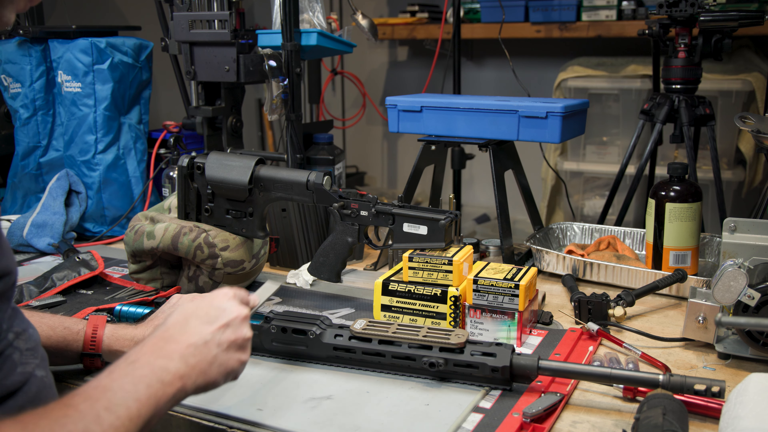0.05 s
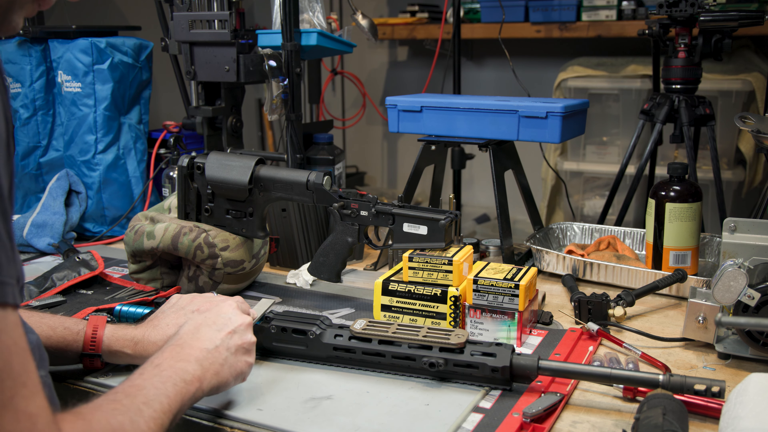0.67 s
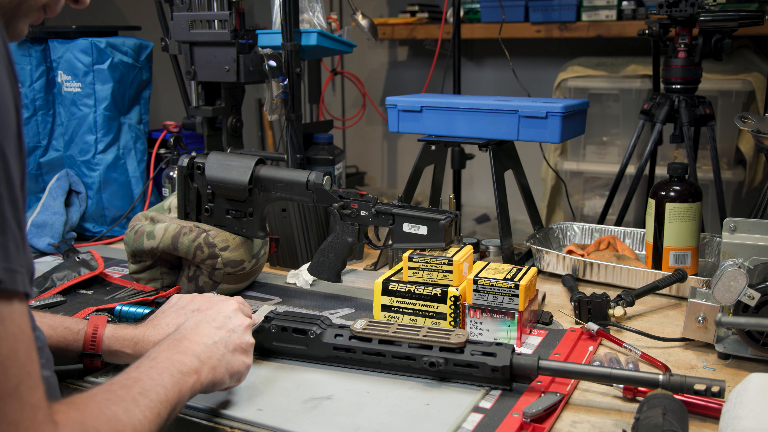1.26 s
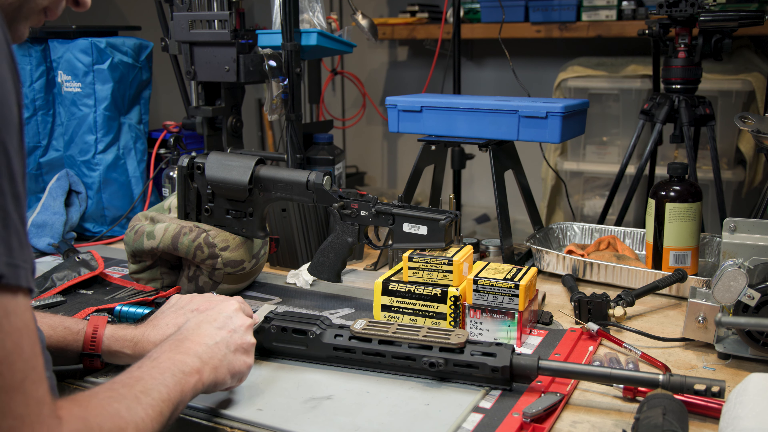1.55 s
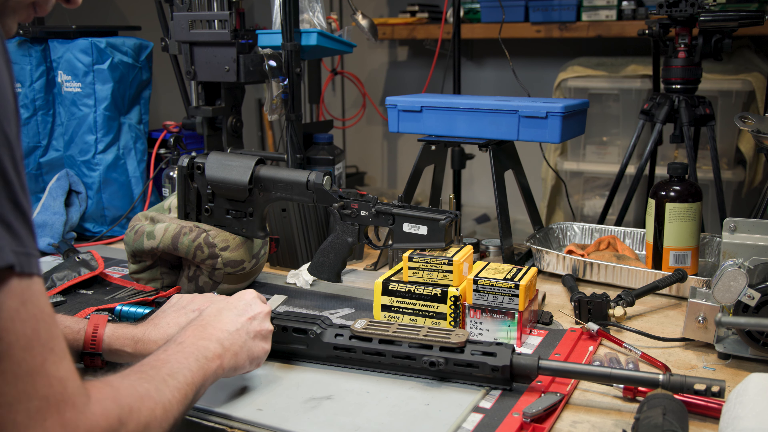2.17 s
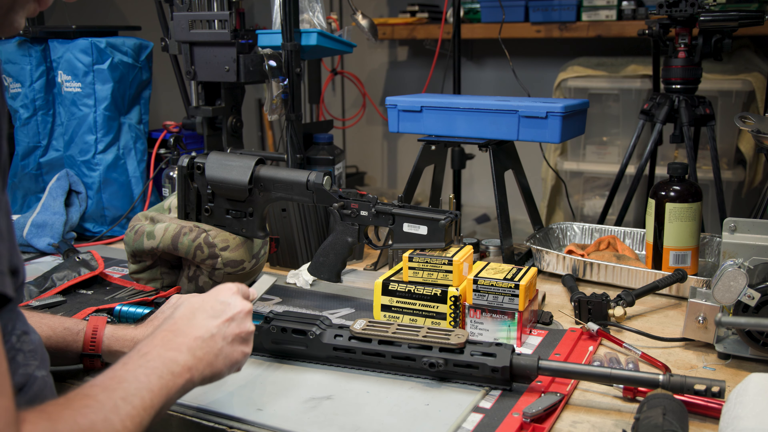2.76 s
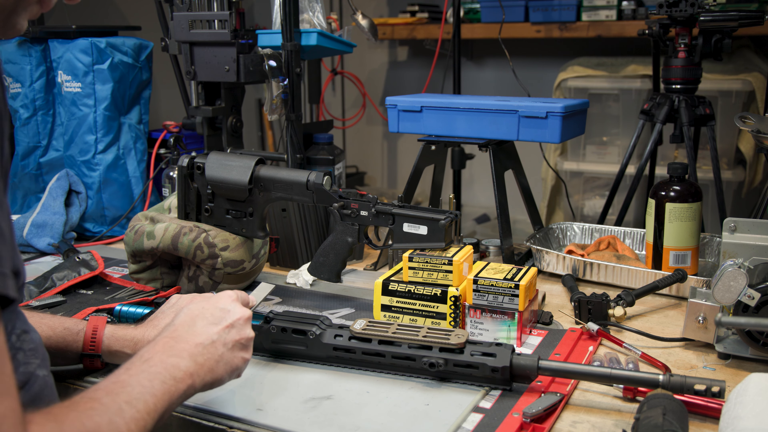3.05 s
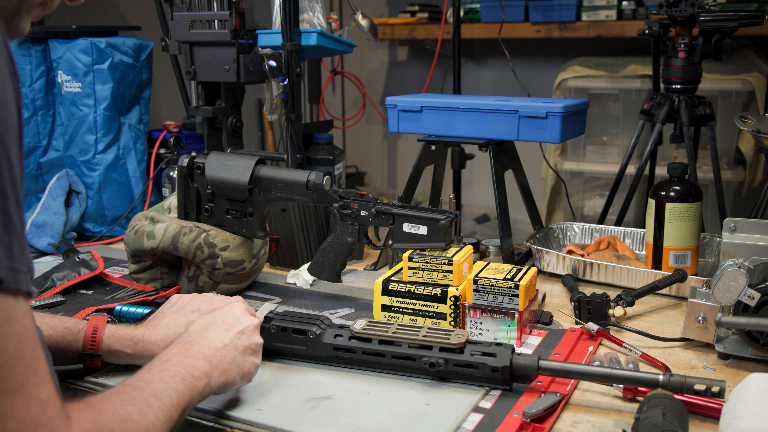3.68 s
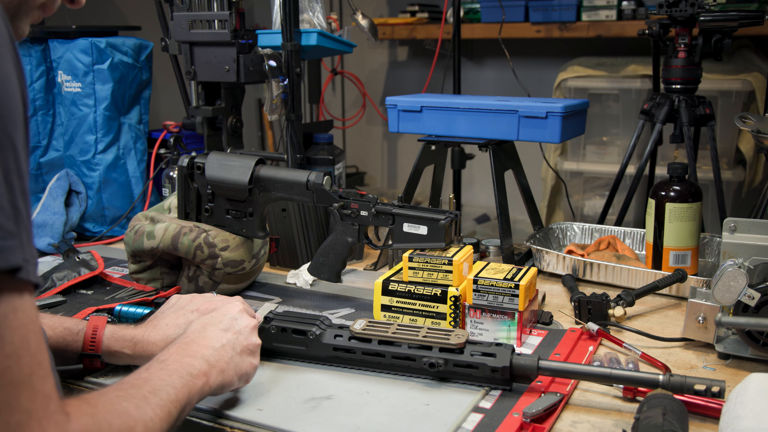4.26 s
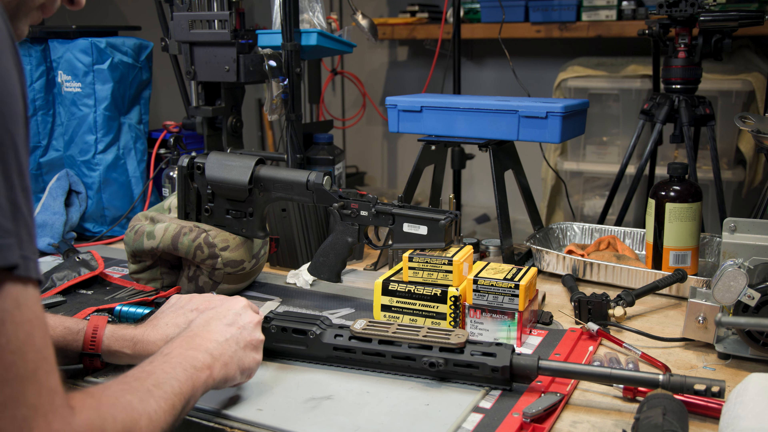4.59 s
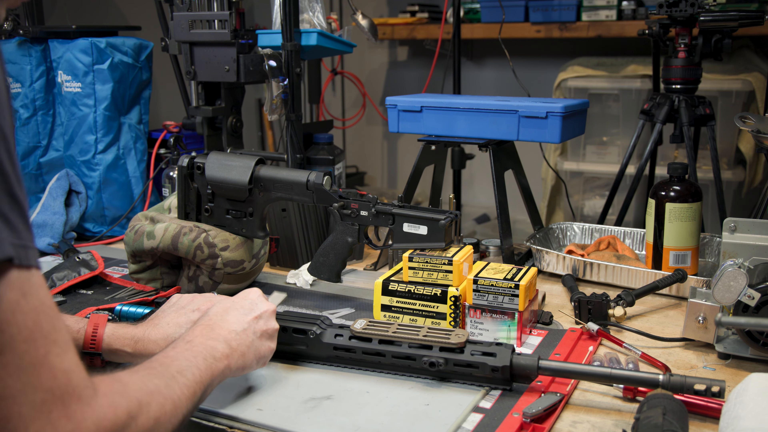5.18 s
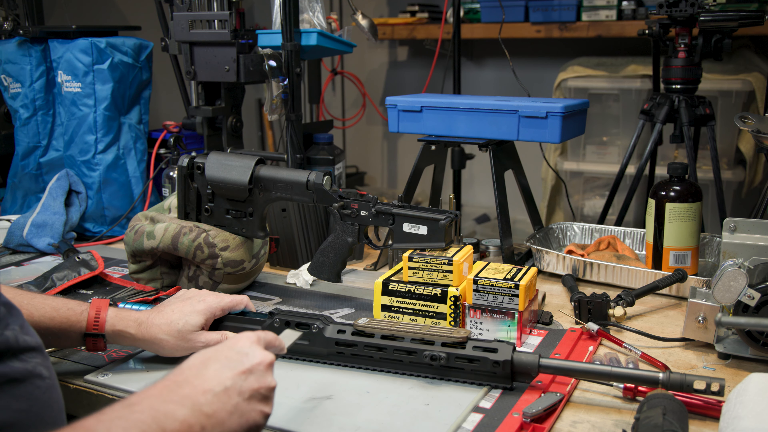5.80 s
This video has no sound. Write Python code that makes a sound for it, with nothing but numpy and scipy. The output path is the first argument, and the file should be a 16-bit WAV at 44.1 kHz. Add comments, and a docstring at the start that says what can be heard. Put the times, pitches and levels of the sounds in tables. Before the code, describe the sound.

A loose metal fitting clicks a few times. A metal file lands on a metal part with a sharp knock, then is drawn across it in one bright, rasping stroke followed by a short scrape. The knock, stroke and scrape happen a second time. At the end, hands shift with a dry tick and the part slides softly on its mat. A fan hums faintly throughout in the small workshop.

```python
"""A small workshop, at the bench, with a fan humming behind. A metal file lands on a metal part with a
knock, then is drawn across it in a rasping stroke and a short after-scrape; this happens twice.
The teeth catch at random and ring the steel and the bench top. A loose fitting clicks at the start;
at the end the hands shift and the part slides a little on its mat."""
import sys
import numpy as np
from scipy import signal
from scipy.fft import rfft, irfft, next_fast_len
from scipy.io import wavfile
from scipy.ndimage import uniform_filter1d, map_coordinates

SR = 44100
rng = np.random.default_rng(int(sys.argv[2]) if len(sys.argv) > 2 else 0)


def output_pcm(signal):
    """Save a mono or channel-first signal as 16-bit PCM at the path in sys.argv[1].

    Samples are clipped to [-1, 1] before scaling.
    """
    pcm = np.clip(np.atleast_2d(signal).T, -1, 1) * 32767
    wavfile.write(sys.argv[1], SR, np.round(pcm).astype(np.int16))


N = 261848


def amp(db):
    """Decibels to gain."""
    return 10 ** (np.asarray(db) / 20)


def unit(x):
    """Scale to rms 1."""
    return x / np.sqrt(np.mean(x ** 2) + 1e-20)


def along(points, hz):
    """(Hz, value) points joined on a log axis."""
    f, v = np.transpose(points)
    return np.interp(np.log(hz + 1), np.log(f + 1), v)


def automation(points):
    """(Seconds, value) points joined into one value per sample."""
    return np.interp(np.arange(N) / SR, *np.transpose(points))


def wobble(rate):
    """A smooth random curve, rate knots a second."""
    return map_coordinates(rng.standard_normal(8192), [np.arange(N) * rate / SR], mode="wrap")


def zero_phase(x, gain):
    """Zero-phase EQ with a given gain at each frequency."""
    size = next_fast_len(len(x) + 8192)
    return irfft(rfft(x, size) * gain(np.fft.rfftfreq(size, 1 / SR)), size)[:len(x)]


def causal(x, gain):
    """Minimum-phase EQ: nothing rings ahead of the hit."""
    size = 16384
    cepstrum = irfft(np.log(gain(np.fft.rfftfreq(size, 1 / SR)) + 1e-6))
    cepstrum[1:size // 2] *= 2
    cepstrum[size // 2 + 1:] = 0
    return signal.fftconvolve(x, irfft(np.exp(rfft(cepstrum))))[:len(x)]


def coloured(x, points):
    """x through an EQ curve of (Hz, dB) points."""
    return causal(x, lambda hz: amp(along(points, hz)))


def resonate(x, modes, bare=None):
    """x through steep-sided resonances that stand on an optional bare spectrum."""
    def gain(f):
        power = sum((amp(db) * (f * width) ** 2 / ((hz * hz - f * f) ** 2 + (f * width) ** 2)) ** 2
                    for hz, width, db in modes)
        floor = 0 if bare is None else amp(along(bare, f))
        return np.sqrt(power + floor ** 2)
    return causal(x, gain)


def band(x, lo_hz, hi_hz):
    """The part of x between two soft edges, at rms 1."""
    edges = lambda hz: 1 / np.sqrt((1 + (lo_hz / (hz + 1)) ** 20) * (1 + (hz / hi_hz) ** 20))
    return unit(zero_phase(x, edges))


def burst(t60):
    """The force of a contact: a flurry of tiny impacts that dies away."""
    t = np.arange(SR // 4) / SR
    return rng.choice([-1, 1], len(t)) * amp(-60 * t / t60)


def friction(per_second, spread_db, chatter_db, chatter_rate):
    """Tiny catches snap free at random; stick and slip make their strength flutter."""
    snaps = (rng.random(N) < per_second / SR) * rng.choice([-1, 1], N)
    strength = amp(spread_db * rng.standard_normal(N))
    return unit(snaps * strength * amp(chatter_db * wobble(chatter_rate)))


def add(track, start, db, sound):
    """Drop in a one-shot at a peak level, taken as three times the rms of its loudest 5 ms."""
    peak = 3 * np.sqrt(uniform_filter1d(sound ** 2, size=SR // 200).max())
    place = track[max(round(start * SR), 0):][:len(sound)]
    place += amp(db) * sound[:len(place)] / peak


# The fan creeps up in speed. Each row: time in seconds, blade tone in Hz.
FAN_SPEED = [(0.0, 708.9), (3.52, 708.5), (3.65, 712.0), (5.7, 714.8)]
# The hum swells and fades a little as someone moves nearby. Each row: time in seconds, level in dB.
HUM_LEVEL = [(0, -55), (3.6, -57), (4.2, -53.5), (5.5, -56)]
# The hum's partials. Each row: multiple of the shaft rate, relative level in dB.
HUM_PARTIALS = [(6, -14.5), (7, -25), (8, -16), (9, -14), (10, -12), (11, 0), (12, -11), (13, -18),
                (14, -8), (17, -19), (19, -25), (20, -31), (21, -18)]
# The dark bed of moving air. Each row: frequency in Hz, gain in dB.
AIR_EQ = [(15, -57), (25, -24), (108, -2.5), (384, -11.5), (463, -15.5), (641, -15), (714, -7.5),
          (840, -27.5), (911, -11.5), (988, -17.5), (1330, -17), (1700, -26), (5280, -32.5), (14000, -30),
          (16000, -39)]

def fan(blades=11, air_db=-60):
    """Blade tone and shaft harmonics, each wavering a little, over a soft rush of air."""
    turns = np.cumsum(automation(FAN_SPEED) / blades) / SR
    hum = np.zeros(N)
    for order, db in HUM_PARTIALS:
        gain = amp(db + 0.38 * wobble(8.1))
        hum += gain * np.sin(2 * np.pi * (order * turns + rng.random()) + 0.12 * wobble(14))
    air = coloured(rng.standard_normal(N), AIR_EQ)
    return amp(automation(HUM_LEVEL)) * unit(hum) + amp(air_db) * unit(air)


# The workshop's short reverb. Each row: frequency in Hz, t60 in seconds.
ROOM_DECAY = [(150, .4), (1000, .43), (2500, .43), (5000, .37), (10000, .3), (15000, .21)]
# The EQ on the reverb return. Each row: frequency in Hz, gain in dB.
ROOM_EQ = [(300, -5.5), (1500, -12.5), (3200, -10), (3900, -10), (4650, -16.5), (5600, -10), (12000, -16.5)]

def room(x, build_s=0.0095):
    """The workshop's diffuse answer; the treble dies first."""
    hz, t, noise = signal.stft(rng.standard_normal(SR * 3 // 4), SR, nperseg=256)
    decay = amp(-60 * t / along(ROOM_DECAY, hz)[:, None])
    tail = signal.istft(noise * decay, SR, nperseg=256)[1]
    tail *= 1 - np.exp(-np.arange(len(tail)) / SR / build_s)
    wet = signal.fftconvolve(x, tail / np.linalg.norm(tail))[:N]
    return coloured(wet, ROOM_EQ)


# The ring of the sliding part. Each row: pitch in Hz, width in Hz, gain in dB.
SLIDE_MODES = [(1580, 140, 0), (1930, 150, -12), (3100, 600, -14), (3740, 250, -17), (11400, 500, -27)]
# The dull rub of the mat. Each row: frequency in Hz, gain in dB.
MAT_EQ = [(150, -41), (280, -5.5), (700, -36), (1300, -17), (4000, -28), (7000, -41.5), (16000, -37.5)]

def slide(peak_s=5.915, peak_db=-51, swell_db_per_s=90, stop_db_per_s=252):
    """The part rubs softly over its mat, swelling until it stops."""
    force = friction(per_second=3040, spread_db=2.5, chatter_db=-2, chatter_rate=90)
    t = np.arange(N) / SR - peak_s
    envelope_db = peak_db + np.minimum(swell_db_per_s * t, -stop_db_per_s * t)
    return amp(envelope_db) * unit(resonate(force, SLIDE_MODES, MAT_EQ))


# Hand foley. Each row: start in seconds, peak in dB, centre in Hz, width in octaves, t60 in seconds.
HAND_TOUCHES = [(5.226, -38.5, 273, 0.81, 0.1), (5.662, -25.5, 3000, 6.4, 0.021),
                (5.672, -43.5, 10300, 0.22, 0.27), (5.701, -37, 8200, 0.19, 0.068),
                (5.73, -50, 5300, 0.72, 0.36)]

def hands():
    """The hands shift: a soft bump, dry ticks and brushes, each a burst in one broad or narrow band."""
    track = np.zeros(N)
    for start, db, centre_hz, octaves, t60 in HAND_TOUCHES:
        hump = lambda hz: np.exp(-0.5 * (np.log2((hz + 1) / centre_hz) / octaves) ** 2)
        add(track, start, db, causal(burst(t60), hump))
    return track


# The opening clicks. Each row: start in seconds, peak in dB, contact t60 in seconds.
FITTING_CLICKS = [(0.0, -28, 0.094), (0.0622, -20, .022), (.108, -22.5, 0.032), (0.152, -36.5, 0.082)]
# The fitting's thin ring. Each row: pitch in Hz, width in Hz, gain in dB.
FITTING_MODES = [(1020, 41, -4), (1620, 74, -13.5), (2670, 220, -12), (2910, 43, -7), (3370, 31, -1),
                 (3885, 92, 5), (4130, 150, -5), (4800, 66, 0), (5170, 110, 3), (5480, 380, 0.5),
                 (6990, 240, -6), (8900, 670, -20)]
# The dry snap under that ring. Each row: frequency in Hz, gain in dB.
SNAP_EQ = [(500, -59), (2000, -17.5), (2800, -16), (5500, -10), (7500, -21.5), (11000, -43), (16000, -45.5)]

def loose_fitting(rattle_db=-17.5, rattle_t60=0.17):
    """A small loose fitting clicks a few times and buzzes on after each click."""
    track = np.zeros(N)
    for start, db, t60 in FITTING_CLICKS:
        force = burst(t60) + amp(rattle_db) * burst(rattle_t60)
        add(track, start, db, resonate(force, FITTING_MODES, SNAP_EQ))
    return track


# The clank of the struck part. Each row: pitch in Hz, width in Hz, gain in dB.
PART_MODES = [(440, 110, -18), (970, 130, 0), (1184, 110, -2), (1287, 90, -7), (1665, 110, -1),
              (1860, 170, -0.5), (2019, 100, -2), (2370, 260, -6), (2710, 80, -4), (3133, 110, -2.5),
              (4300, 260, -6), (4690, 260, -2), (5740, 220, -8), (6180, 180, -6), (7290, 180, -4),
              (8300, 400, -15), (9260, 170, -10), (10310, 420, -12), (11049, 130, -10), (11195, 150, -11),
              (12550, 300, -24), (14200, 350, -23)]
# The crack of metal on metal. Each row: frequency in Hz, gain in dB.
CRACK_EQ = [(100, -46.5), (300, -38.5), (430, -23), (650, -28.5), (950, -12), (2400, -10), (3700, -13.5),
            (4600, -19), (5200, -15), (6200, -13.5), (11000, -18.5), (12200, -28), (16000, -35)]

def struck_part(lower_hz, upper_hz, boost_db, tilt, t60):
    """The file touches the part; the spot that it hits favours two groups of modes."""
    octaves = lambda hz, centre_hz: np.log2((hz + 20) / centre_hz)
    def spot(hz):
        favoured = sum(np.exp(-(octaves(hz, centre) / 0.16) ** 2) for centre in (lower_hz, upper_hz))
        return amp(boost_db * favoured + tilt * octaves(hz, upper_hz))
    return causal(resonate(burst(t60), PART_MODES, CRACK_EQ), spot)


# Light lead-in touches. Each row: start in seconds, peak in dB, tilt in dB per octave.
GRAZES = [(1.600, -41, 8), (1.633, -25, 7), (4.345, -45.5, 2.5), (4.395, -48.5, 4), (4.515, -44, 3.5),
          (4.601, -43, 6), (4.622, -30.5, 1.5), (5.292, -29, -2)]

def grazes():
    """The teeth graze the edge as the file is lined up for a stroke."""
    track = np.zeros(N)
    for start, db, tilt in GRAZES:
        touch = struck_part(lower_hz=4500, upper_hz=11800, boost_db=7.5, tilt=tilt, t60=0.093)
        add(track, start, db, touch)
    return track


# Hard hits and small taps. Each row: start in seconds, peak in dB, lower and upper favoured pitch in Hz,
# their boost in dB, tilt in dB per octave, contact t60 in seconds.
KNOCKS = [(0.8984, -7.5, 460, 1164, 12.8, -0.5, 0.068), (1.095, -38, 1650, 4330, 16, -1, 0.026),
          (2.348, -34, 2670, 11000, 3.8, 2.5, 0.051), (3.637, -21.5, 1050, 1983, 3.2, -0.5, 0.037),
          (3.650, -30, 1050, 1950, 1.5, -1, 0.3), (3.686, -6.5, 2317, 4550, 4.1, 1, 0.067)]

def knocks():
    """The file lands on the part and sets it ringing."""
    track = np.zeros(N)
    for start, db, *tone in KNOCKS:
        add(track, start, db, struck_part(*tone))
    return track


def travelling(force, patchy_db):
    """A moving contact feeds now these modes, now those."""
    spectrum = signal.stft(force, nperseg=256)[2]
    patches = uniform_filter1d(rng.standard_normal(spectrum.shape), size=4, axis=0)  # across frequency
    patches = uniform_filter1d(patches, size=14, axis=1)  # across time
    return signal.istft(spectrum * amp(patchy_db * unit(patches)), nperseg=256)[1][:N]


# File and part ringing together. Each row: pitch in Hz, width in Hz, gain in dB.
STEEL_MODES = [(960, 250, -17), (1180, 150, -8), (1730, 150, -6), (2050, 170, -11), (2710, 70, -7),
               (2920, 120, -13), (4330, 300, -7.5), (4660, 190, -3), (5776, 260, -8), (6156, 60, -5),
               (6420, 420, -5), (7590, 240, -3), (8000, 300, -8), (8208, 80, -1), (8500, 380, -7),
               (9040, 160, -3), (9260, 150, 0), (9637, 90, -3), (10550, 420, -7), (10820, 90, -4),
               (11049, 60, -7), (11195, 60, -3), (11500, 140, -7), (11750, 240, -7), (12490, 190, -4),
               (12850, 450, -9), (14120, 170, -8), (14500, 330, -13), (15080, 130, -9)]
# The bare grit of the teeth. Each row: frequency in Hz, gain in dB.
GRIT_EQ = [(500, -32.5), (1400, -27), (2400, -22.5), (3400, -26.5), (3900, -22.5), (5200, -12),
           (7000, -14.5), (10000, -16.5), (12200, -19.5), (13500, -22), (15700, -21)]
# A close pair of modes that a stroke sets singing. Each row: pitch in Hz, width in Hz, gain in dB.
SINGING_MODES = [(4622, 100, -2), (4685, 100, 0)]
# The low weight of the bench top. Each row: pitch in Hz, width in Hz, gain in dB.
BENCH_MODES = [(126, 40, -1.5), (160, 55, 3.5), (243.7, 55, -3.5), (375.3, 69, -7), (496, 80, -3.5)]
# Accents where the teeth dig in or skip. Each row: centre in seconds, level change in dB,
# half length in seconds, shrillness in dB.
BITES = [(1.686, 7, .018, -3), (1.77, 5, .01, 0), (1.841, 12, 0.011, 10), (1.858, 4.5, .004, 13),
         (1.882, 5.5, .012, 9), (1.93, 5, 0.022, 4), (1.964, 7.5, 0.0076, 4), (2.007, 4.5, 0.011, 5),
         (2.062, 5, .027, 2), (4.672, 3, .011, -6), (4.717, -3.5, 0.0042, 0), (4.76, 4, 0.0176, 1),
         (4.817, 3, .008, 0), (4.907, 9, 0.025, -1), (4.98, -6.5, .025, -3), (5.056, 10, 0.039, 2)]
# Long stroke, short after-scrape, twice. Each row: start of the hold and its length in seconds, release
# in dB per second, rasp level in dB, then body, singing, shrill ring and bench in dB against the rasp.
STROKES = [(1.667, 0.44, 231, -33.5, -8.5, -18, -8, -27.5),
           (2.277, 0.015, 850.5, -37, -7.5, -10, -15.5, -28), (4.637, 0.45, 328.5, -32, -8, -6, -12, -21),
           (5.318, 0.016, 650, -38.5, 1, -2, 1, -29)]

def filing(attack_db_per_s=1102.5, sing_fade_db_per_s=16, lean_db_per_s=8):
    """The teeth catch and ring the steel; a shrill bite moves the ring from the low modes to the high."""
    t = np.arange(N) / SR
    bite_db, bright_db = sum(np.outer([db, shrillness], np.exp(-((t - centre) / half_length) ** 2))
                             for centre, db, half_length, shrillness in BITES)
    teeth = friction(per_second=7400, spread_db=2.5, chatter_db=0.9, chatter_rate=290)
    force = travelling(teeth, patchy_db=2.8)
    steel = resonate(force, STEEL_MODES, GRIT_EQ)
    rasp = amp(-3.5) * (band(steel, 3500, 7760) + band(steel, 11000, 17000))
    body = amp(-0.44 * bright_db) * band(steel, 600, 3900)
    shrill = amp(bright_db) * band(steel, 7900, 9900)
    singing = amp(-0.77 * bright_db) * unit(resonate(force, SINGING_MODES))
    bench = band(resonate(force, BENCH_MODES), 108, 1000)
    track = np.zeros(N)
    for start, hold, release, rasp_db, body_db, sing_db, shrill_db, bench_db in STROKES:
        attack_db = -attack_db_per_s * np.maximum(start - t, 0)
        release_db = -release * np.maximum(t - start - hold, 0)
        held_s = np.clip(t - start, 0, hold)
        rings = amp(body_db) * body + amp(shrill_db) * shrill
        rings += amp(sing_db - sing_fade_db_per_s * held_s) * singing
        rumble = amp(bench_db + lean_db_per_s * held_s) * bench  # the hand leans ever harder
        track += amp(rasp_db + attack_db + release_db + bite_db) * (rasp + rings + rumble)
    return track


def scene():
    """Bench work and its reverb over the fan, in mono."""
    work = filing() + knocks() + grazes() + loose_fitting() + slide() + hands()
    return (work + room(work) + fan())[None]


def record(dry, low_cut_hz=48, top_hz=15800):
    """The microphone drops the deepest bass and keeps nothing above its band limit."""
    microphone = lambda hz: (hz < top_hz) / np.sqrt(1 + (low_cut_hz / (hz + 1)) ** 6)
    return np.array([zero_phase(channel, microphone) for channel in dry])


dry = scene()
out = record(dry)
output_pcm(out)
```